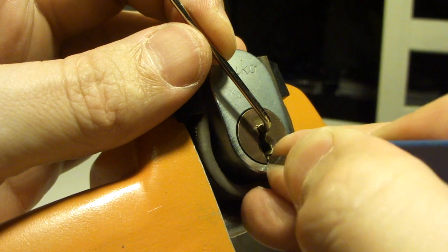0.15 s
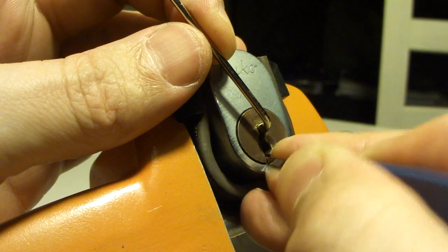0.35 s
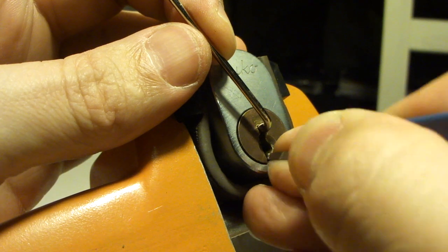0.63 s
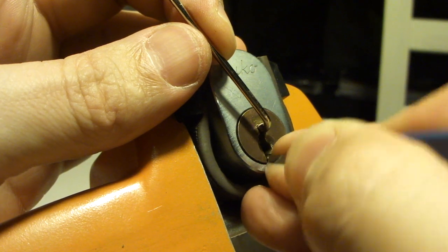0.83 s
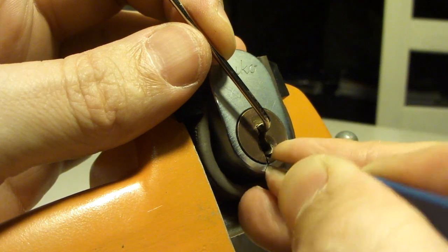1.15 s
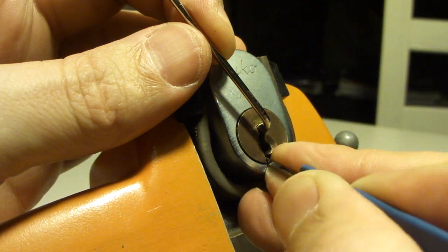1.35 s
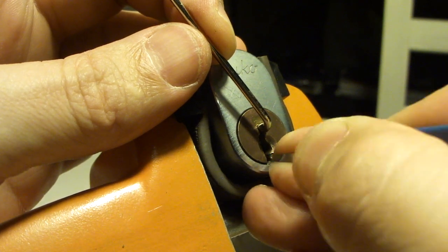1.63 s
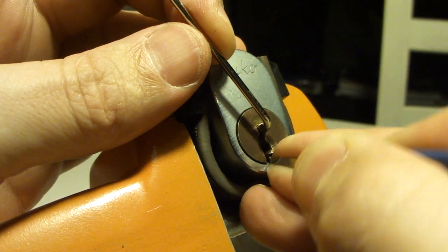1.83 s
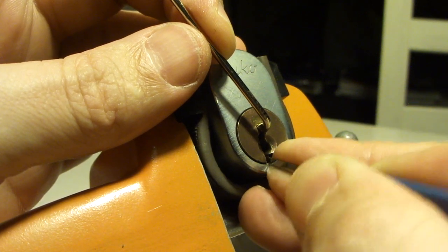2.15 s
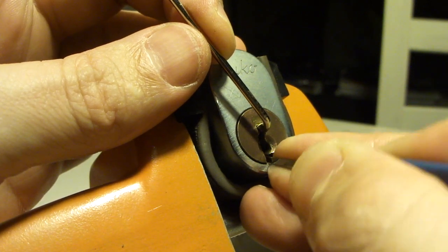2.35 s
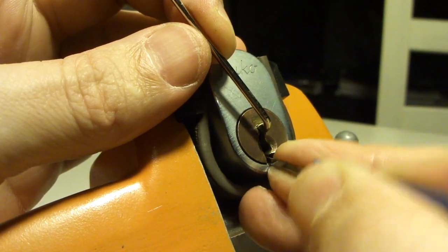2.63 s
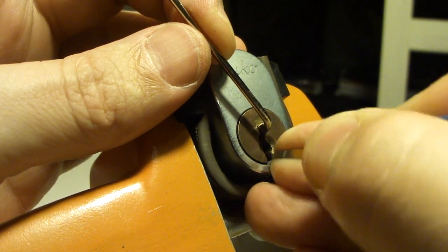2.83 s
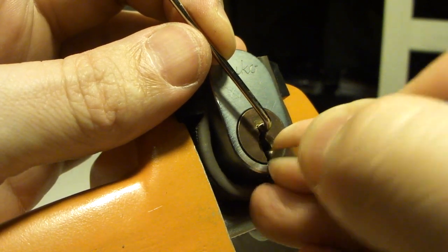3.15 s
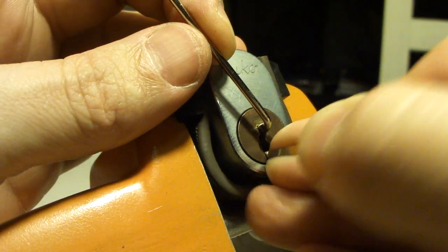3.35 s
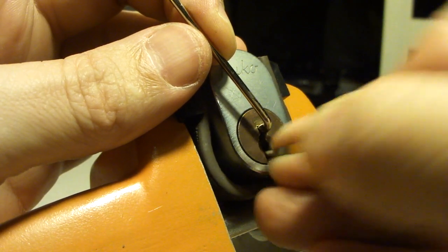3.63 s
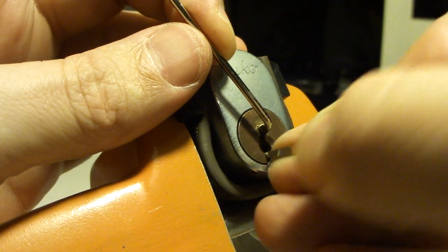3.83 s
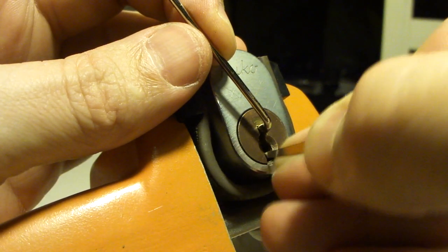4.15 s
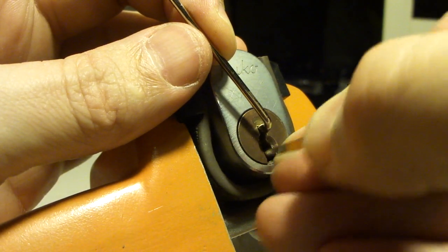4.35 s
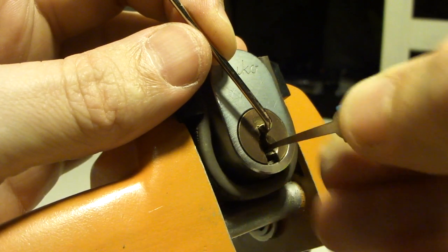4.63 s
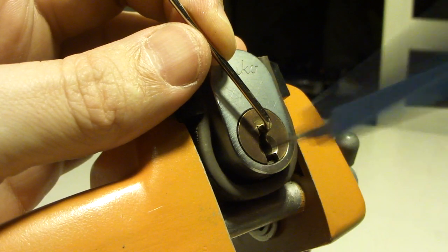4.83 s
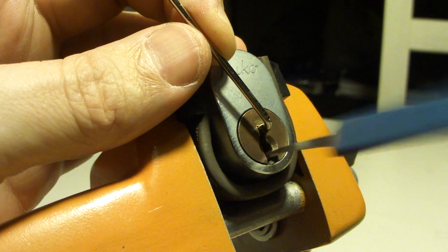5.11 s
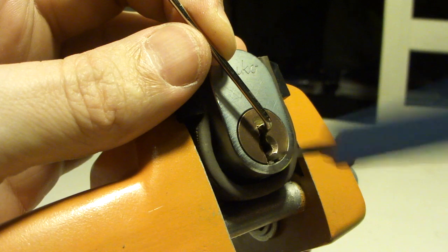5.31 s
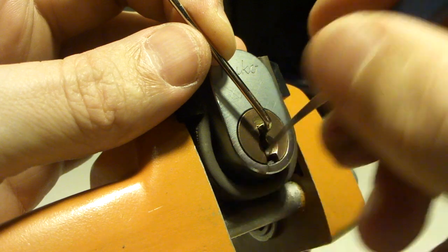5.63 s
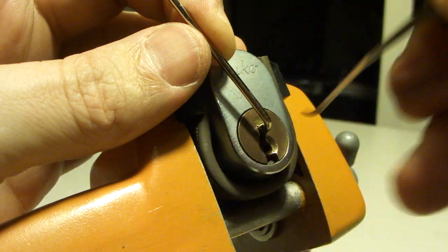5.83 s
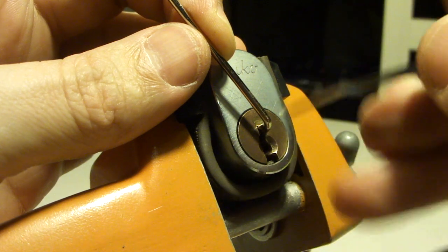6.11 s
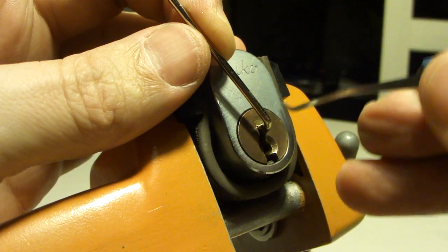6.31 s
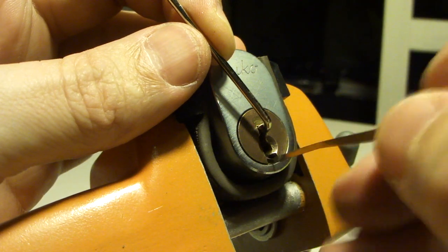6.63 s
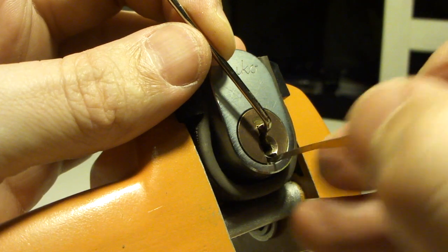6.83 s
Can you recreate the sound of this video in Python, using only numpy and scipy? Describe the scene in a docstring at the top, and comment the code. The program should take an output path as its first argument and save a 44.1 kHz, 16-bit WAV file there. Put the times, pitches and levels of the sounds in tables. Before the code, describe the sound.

Sharp, irregular metallic clicks from a pick snapping lock pins, then a quick scratchy scrape as the blade slides out, in a quiet room.

```python
"""Lock picking, close up

A thin steel pick works the pins of a hand-held lock in a small, quiet workshop, close to a camera.
Snaps, ticks and knocks are short forces that ring modes of mount, lock body, pick and pins; heavy pushes
sway the mount. Drawn out, the pick scrapes over pins by stick and slip; a free tip taps in high mode pairs.
Handling and sliding rub the same modes; reverberation, shaped room noise, hiss and a faint whine surround all.
"""
import sys
import numpy as np
from scipy import signal
from scipy.fft import rfft, irfft
from scipy.io import wavfile

SR = 44100
rng = np.random.default_rng(int(sys.argv[2]) if len(sys.argv) > 2 else 0)


def generate_wav(sig):
    """Save sig (samples, or channels by samples) to the path in sys.argv[1] as 16-bit PCM at SR."""
    pcm = np.round(np.clip(np.atleast_2d(sig).T, -1, 1) * 32767).astype(np.int16)
    wavfile.write(sys.argv[1], SR, pcm)


N = 307377
TIME = np.arange(N) / SR
RING_TIME = TIME[:SR // 3]

# modes of the mount: (frequency [Hz], relative level [dB], t60 [s])
MOUNT = [(292, -12, 0.16), (306, -16, 0.11), (367, 0, 0.061), (410, -3.5, 0.021), (479, -4.5, 0.04),
         (533.5, -1.5, 0.055), (621, -3, 0.075)]
# modes of the lock body: (frequency [Hz], relative level [dB], t60 [s])
BODY = [(737, -17, 0.12), (875, -10, 0.13), (939, -1.5, 0.048), (1035, 3.5, 0.027), (1200, -10, 0.022),
        (1318, 4.5, 0.042)]
# modes of the pick: (frequency [Hz], relative level [dB], t60 [s])
PICK = [(1563, -6.5, 0.14), (1656, -4.5, 0.14), (1811, 9.5, 0.032), (1817, -7.5, 0.036),
        (2013, -7.5, 0.066), (2050, -1.5, 0.045), (2420, -28, 0.033), (2538, -4.5, 0.03)]
# modes of the pins: (frequency [Hz], relative level [dB], t60 [s])
PINS = [(2835, -4, 0.046), (3320, 0.5, 0.012), (4520, -13.5, 0.045), (5590, 1, 0.022), (6010, -2, 0.036),
        (6540, 0, 0.025), (7090, 9, 0.018), (7520, 7.5, 0.0055), (7820, -2, 0.0064), (8070, -4, 0.0081),
        (8240, 2.5, 0.011), (8850, 2, 0.01), (9430, -11, 0.0088), (9900, 0, 0.02), (10100, -1, 0.022)]
# ringing parts: (modes, low edge [Hz], high edge [Hz], lag [ms], trim [dB], crack re modes [dB],
# crack decay [ms], difference between the ports [0-1])
PARTS = [(MOUNT, 204, 654, 0.58, 0, -6.5, 2.9, 0.067), (BODY, 715, 1620, 0.71, 0, -6, 2.3, 0.14),
         (PICK, 1480, 2472, 0.0, 0, -12, 8.6, 0.17), (PINS, 2760, 10330, 0.15, 0, 1, 1.9, 0.57)]

SWAY_HZ, SWAY_WIDTH_HZ = 122.7, 17
CREEP_LEAD_S = .006


def undb(db):
    """Decibels to gain."""
    return 10 ** (np.asarray(db) / 20)


def unit(x):
    """Scale to rms 1."""
    return x / np.sqrt(np.mean(x ** 2))


def band(x, lo_hz, hi_hz, order=3):
    """Causal band-pass, never narrower than 5 %."""
    edges_hz = [lo_hz, max(hi_hz, lo_hz * 1.05)]
    return signal.sosfilt(signal.butter(order, edges_hz, "band", fs=SR, output="sos"), x)


def add(out, s, sound):
    """Mix a stereo sound in at time s."""
    i = int(s * SR)
    out[:, i:i + sound.shape[1]] += sound[:, :N - i]


def hit_level(sound, db, length_s):
    """Give the first length_s of a sound the energy of 10 ms at level db."""
    energy = np.sum(sound[:, :int(length_s * SR)] ** 2) / 2
    return sound * undb(db) * np.sqrt(SR / 100 / energy)


def coloured(points):
    """Noise shaped in frequency by (Hz, dB) points, scaled to rms 1."""
    hz, db = np.transpose(points)
    bins_hz = np.maximum(np.fft.rfftfreq(N, 1 / SR), 1)
    shape_db = np.interp(np.log(bins_hz), np.log(hz), db)
    return unit(irfft(rfft(rng.standard_normal(N)) * undb(shape_db), N))


def air():
    """Steady room noise and hiss, common and opposed between the ports, with a faint electronic whine."""
    # noise common to both ports: (frequency [Hz], relative density [dB per Hz])
    mid_points = [(30, -23), (60, -29), (100, -20), (170, -9.5), (300, -3.5), (900, -6), (2100, -10.5),
                  (2700, -23), (3500, -29.5), (4600, -29.5), (6000, -20.5), (8000, -21), (10700, -24),
                  (12000, -51)]
    # noise opposed between the ports: (frequency [Hz], relative density [dB per Hz])
    side_points = [(30, -35), (60, -34), (100, -14.5), (170, -8), (300, -1), (900, -2.5), (2100, -9),
                   (2700, -22), (3500, -29), (4600, -28.5), (6000, -21.5), (8000, -22), (10700, -28),
                   (12000, -52)]
    mid_db, side_db = -58.5, -55
    whine_hz, whine_db = 7770, -83
    whine = unit(np.sin(2 * np.pi * whine_hz * TIME))
    mid = undb(mid_db) * coloured(mid_points) + undb(whine_db) * whine
    return mid + np.array([[1], [-1]]) * undb(side_db) * coloured(side_points)


def mode_bank(modes):
    """One fading oscillation per mode, starting at full speed."""
    hz, db, t60_s = np.transpose(modes)[:, :, None]
    fade = np.exp(-np.log(1000) * RING_TIME / t60_s)
    return undb(db) * fade * np.cos(2 * np.pi * hz * RING_TIME)


def response(part, bank, favour_db=0, scatter_db=5.0):
    """A part's answer to one contact: randomly weighted modes and a short crack of dense ones."""
    modes, lo_hz, hi_hz, _, _, crack_db, crack_ms, apart = part
    ports = np.array([[1], [-1]]) * apart
    weights = undb(favour_db + scatter_db * rng.standard_normal(len(bank)))
    weights = weights * (1 + ports * rng.standard_normal(len(bank)))
    common, opposed = rng.standard_normal((2, len(RING_TIME)))
    crack = (common + ports * opposed) * np.exp(-RING_TIME * 1e3 / crack_ms)
    # the crack gathers round the strong modes
    top_db = max(db for _, db, _ in modes)
    strong_hz = [hz for hz, db, _ in modes if db > top_db - 7.5]
    crack = band(crack + 1e-18, min(strong_hz), max(strong_hz), order=1)
    ring = unit(weights @ bank)
    return band(ring + undb(crack_db) * unit(crack), lo_hz, hi_hz, order=6)


def grit(size, spread_db=3.0):
    """Tiny slips of very unequal strength."""
    strength_db = spread_db * rng.exponential(size=size).clip(0, 4)
    return unit(rng.standard_normal(size) * undb(strength_db))


def effort():
    """Levels (dB) of handling and sliding: moves swell, hold and die back to the resting hand."""
    # grip shifts and draws of the pick: (start [s], end [s], handling level [dB], sliding level [dB])
    moves = [(4.364, 4.63, -56.5, -67), (4.854, 4.926, -62, -50.5), (4.974, 5.054, -56, -61),
             (5.17, 5.65, -65.5, -61.5), (6.598, 6.847, -65, -67)]
    attack_s, release_s, resting_db = 0.03, 0.11, -81
    power = undb(resting_db) ** 2
    for start_s, end_s, *levels_db in moves:
        before_s = np.maximum(start_s - TIME, 0)
        after_s = np.maximum(TIME - end_s, 0)
        swell = np.exp(-before_s / attack_s - after_s / release_s)
        power = power + (undb(levels_db)[:, None] * swell) ** 2
    return 10 * np.log10(power)


def rubbing(banks, body_db=-3, pins_db=-9, soft_hz=320, soft_db=5):
    """Fingers shift on the mount and the blade slides in the keyway: fine friction; sliding sways the mount."""
    hand_db, slide_db = effort()
    out = 0
    for part, bank, db in zip(PARTS, banks, [hand_db, slide_db + body_db, slide_db, slide_db + pins_db]):
        slips = grit(N) * (rng.random(N) < 280 / SR)  # 280 slips per second on average
        # soft skin favours the low modes
        mode_hz = np.array(part[0])[:, 0]
        favour_db = soft_db * np.exp(-(3 * np.log(mode_hz / soft_hz)) ** 2)
        sound = signal.fftconvolve(response(part, bank, favour_db), slips[None])[:, :N]
        out = out + unit(sound) * undb(db)
    sway = band(rng.standard_normal(N), SWAY_HZ - SWAY_WIDTH_HZ / 2, SWAY_HZ + SWAY_WIDTH_HZ / 2, order=2)
    # sway grows steeply with sliding: 1.73 dB per dB from -66.5 dB at a -60 dB slide, floor -80.5 dB
    sway_db = np.maximum(-66.5 + 1.73 * (slide_db + 60), -80.5)
    return out + unit(sway) * undb(sway_db)


def depth(s):
    """How deep the blade bears at time s: 0 at the mouth of the keyway, 1 at the back."""
    # blade position: (time [s], depth [0-1])
    depth_points = [(0, 0.96), (3.55, 0.88), (4.3, 0), (5.0, 0.57), (5.6, .05)]
    return np.interp(s, *np.transpose(depth_points))


def part_levels(s, db, weight_db, edge_db):
    """Share a contact among mount, body, pick and pins (dB); the body rings more near the keyway mouth."""
    base_db, weight_share, mouth_db = -10, 0.37, 7.5
    body_db = base_db + weight_share * weight_db + mouth_db * (1 - depth(s))
    return db + np.array([weight_db, body_db, 0, edge_db])


def even(force):
    """Hard contacts push all modes about equally: keep a force's timing, level its spectrum."""
    spectrum = rfft(force, 4096)
    power = np.abs(spectrum) ** 2
    return irfft(spectrum / np.sqrt(power + power.mean() / 10))[:len(force)]


def snap(chatter_ms, db, chatter=0.93, creep_db=-50, creep_s=0.0021):
    """Force of one snap: the pin creeps for a moment, lets go, and chatters against its seat."""
    t = TIME[:SR // 50]
    age = t * 1e3 / chatter_ms
    bounces = grit(len(t)) * age * np.exp(-age)
    bounces *= chatter / np.linalg.norm(bounces)
    bounces[0] += 1
    release = even(bounces)
    # relative to db, so creep is equally faint before soft and hard snaps (capped at half the release)
    before_s = TIME[:int(CREEP_LEAD_S * SR)][::-1]
    slips = grit(len(before_s)) * np.exp(-before_s / creep_s)
    creep = min(undb(creep_db - db), .5) * slips / np.linalg.norm(slips)
    return np.concatenate([creep, release / np.linalg.norm(release)])


def blow(banks, s, levels, focus_width=0.15, focus_db=7):
    """One contact rings every part at its level (dB); returns (start s, sound) for each part."""
    mount_db, _, pick_db, _ = levels
    # harder snaps chatter longer: 0.38 ms for the faintest, 8.6 ms more at full scale
    force = snap(0.38 + 8.6 * undb(pick_db), max(levels))
    # favoured mount pitch: higher under a deep pick, lower under a heavy push
    mouth_hz, deep_hz, pick_hz, weight_db_per_octave = 385, 482, 1810, 55
    mount_hz = np.interp(depth(s), [0, 1], [mouth_hz, deep_hz])
    mount_hz = mount_hz * 2 ** ((pick_db - mount_db) / weight_db_per_octave)
    rings = []
    for part, bank, db in zip(PARTS, banks, levels):
        modes, _, _, lag_ms, trim_db = part[:5]
        distance = np.log(np.array(modes)[:, :1] / [mount_hz, pick_hz]) / focus_width
        favour_db = focus_db * np.exp(-distance ** 2).sum(1)
        sound = signal.fftconvolve(response(part, bank, favour_db), force[None])
        sound = hit_level(sound, db + trim_db, CREEP_LEAD_S + .02)
        rings.append((s - CREEP_LEAD_S + lag_ms / 1e3, sound))
    return rings


def faint_ticks(count=5):
    """Light touches at loosely spread moments as the pick feels along the pins; rows as for snaps."""
    start_s, end_s = 3.9, 4.8
    mean_db, spread_db, weight_db, edge_db = -60, 2, -4, -6
    place, strength = rng.random((count, 2)).T
    times_s = start_s + (end_s - start_s) * (np.arange(count) + place) / count
    levels_db = mean_db + spread_db * (2 * strength - 1)
    return [(s, db, weight_db, edge_db) for s, db in zip(times_s, levels_db)]


def clicks(banks):
    """Snapping pins, faint touches and knocks of the shank on the keyway wall, all ringing every part."""
    # pins snapping: (time [s], pick level [dB], push on the mount re pick [dB], pin tick re pick [dB])
    snaps = [(.152, -29, -13, -17), (0.3841, -18, -2, -16), (0.496, -47, -3, -22), (.5905, -45, 7, -13),
             (.625, -42, 3, -8), (.64, -46, -2, -9), (.917, -47, -5, -20), (.961, -49, -2.5, -25),
             (1.0651, -29, -13.5, -23.5), (1.115, -28.5, -8, -7.5), (1.306, -50, -20, -20),
             (1.603, -42.5, -2.5, -8), (1.863, -41, -7, -20.5), (1.926, -34.5, 8, -5.5),
             (2.8116, -30, -16, -3), (3.212, -35, -5, -11), (3.557, -40.5, -11, -17.5),
             (3.575, -51.5, 4, -10), (3.65, -46.5, -7.5, -23), (3.822, -53, -6, -16),
             (3.976, -52.5, -0.5, -11), (4.299, -54, -5, -7), (4.365, -56.5, 10, -8),
             (4.4025, -40.5, -7, -18.5), (4.469, -38, -15, -6), (4.617, -44, -9, -22),
             (4.691, -49, -9, -10.5), (4.841, -36.5, -8.5, -6), (4.8955, -39, -1, -3.5),
             (5.006, -32.5, -8, -9), (5.232, -48.5, 3.5, 0.5), (5.555, -53.5, -9, -1),
             (5.59, -52.5, 3, 7.5), (6.59, -52, 1.5, -7), (6.616, -58.5, -1, 4.5), (6.637, -57.5, -3, 3),
             (6.832, -46, -6.5, -16.5)]
    # shank knocks, mostly ringing the lock body: (time [s], body level [dB])
    knocks = [(.725, -44.5), (4.617, -45), (4.8954, -36.5), (4.95, -43), (5.008, -37.5), (5.361, -52),
              (5.554, -44), (6.637, -49.5)]
    knock_parts_db = np.array([-13.5, 0, -5.5, -18])  # mount, body, pick, pins re body
    contacts = [(row[0], part_levels(*row)) for row in list(snaps) + faint_ticks()]
    contacts += [(s, db + knock_parts_db) for s, db in knocks]
    out = np.zeros((2, N))
    for s, levels in contacts:
        for start_s, sound in blow(banks, s, levels):
            add(out, start_s, sound)
    return out


def room(x, first_s=0.0016, apart=0.21):
    """Diffuse reflections from bench and walls: fading noise per band; the lows stay longest."""
    # reverberation: (low edge [Hz], high edge [Hz], level before band-pass [dB], t60 [s])
    reverb_bands = [(89.5, 336, -11.5, 0.45), (232, 1100, -11, 0.31), (650, 1290, -11, 0.37),
                    (1450, 3500, -15.5, 0.38), (2650, 10600, -13.5, 0.21)]
    t, tail = TIME[:SR * 3 // 4], 0
    for lo_hz, hi_hz, db, t60_s in reverb_bands:
        common, opposed = rng.standard_normal((2, len(t)))
        onset = np.clip(t / first_s - 1, 0, 1)
        fade = np.exp(-np.log(1000) * t / t60_s) * onset
        echoes = (common + np.array([[apart], [-apart]]) * opposed) * fade
        tail = tail + undb(db) * band(echoes / np.linalg.norm(echoes[0]), lo_hz, hi_hz)
    return signal.fftconvolve(x, tail, axes=1)[:, :N]


def thumps(t60_s=0.41, dull_hz=95, dull_t60_s=0.057, dull_db=2):
    """Heavy pushes rock the mount: a short dull lurch, then a longer sway at the sway mode."""
    # pushes: (time [s], level [dB])
    pushes = [(.385, -44), (.591, -52.5), (.626, -51), (1.118, -58), (1.93, -57.5), (4.368, -64),
              (4.618, -62)]
    out = np.zeros((2, N))
    sway = band(mode_bank([(SWAY_HZ, 0, t60_s), (dull_hz, dull_db, dull_t60_s)]).sum(0), 76, 167)
    for s, db in pushes:
        add(out, s, hit_level(np.array([sway, sway]), db, .02))
    return out


def scrapes(banks, weight_db=-2.5, slip_rate_hz=650, fine=0.1, sizzle_db=-10):
    """A short run of stick and slip as the blade rides over a pin; its rough edge sizzles on top."""
    # drags over a pin: (time [s], length [s], pick level [dB], pin level re pick [dB])
    drags = [(0.792, .024, -65.5, 3.5), (3.865, 0.02, -57.5, 3), (4.834, 0.012, -42.5, -15),
             (4.86, 0.015, -44.5, -14), (4.875, 0.0168, -38.5, -4), (4.935, 0.022, -40, -6),
             (4.991, .013, -38.5, -8), (5.046, 0.023, -46, -1.5), (5.105, 0.012, -56.5, 0),
             (5.166, 0.021, -49, -5), (5.229, 0.025, -44, -11.5), (5.304, .021, -53.5, -0.5),
             (5.356, 0.016, -46, -4), (5.43, .024, -52, 0), (5.483, 0.024, -52, -5),
             (5.564, 0.015, -45.5, -9), (5.604, 0.013, -51, -13), (5.711, 0.022, -59, 4),
             (6.822, .008, -54.5, -2)]
    out = np.zeros((2, N))
    for s, length_s, level_db, edge_db in drags:
        levels = part_levels(s, level_db, weight_db, edge_db)
        size = int(length_s * SR)
        contact = signal.windows.tukey(size, .6)
        slips = (rng.random(size) < slip_rate_hz / SR) * rng.standard_normal(size)
        force = even((slips + fine * grit(size) / 2) * contact)
        for part, bank, db in zip(PARTS, banks, levels):
            sound = signal.fftconvolve(response(part, bank), force[None])
            add(out, s, hit_level(sound, db, length_s + .012))
        sizzle = unit(force) + .5 * grit((2, size)) * contact
        sizzle = band(sizzle, 8700, 11300, order=2)
        add(out, s, hit_level(sizzle, levels[-1] + sizzle_db, length_s))
    return out


def tinks(t60_s=0.02, pair=0.936, crack_db=-5, crack_s=.002):
    """A free blade tip touches the lock face and rings briefly in a close pair of high modes."""
    # touches: (time [s], level [dB], upper ring frequency [Hz])
    touches = [(.804, -58.5, 6630), (5.732, -47, 6820), (6.6584, -48.5, 6950), (6.671, -48, 6660)]
    out = np.zeros((2, N))
    for s, db, hz in touches:
        ring = mode_bank([(hz, 0, t60_s), (hz * pair, -3, t60_s)]).sum(0)
        crack = rng.standard_normal((2, len(RING_TIME))) * np.exp(-RING_TIME / crack_s)
        crack = band(crack + 1e-18, 5300, 9400)
        add(out, s, hit_level(unit(ring) + undb(crack_db) * unit(crack), db, .02))
    return out


def scene():
    """The lock close up, its reverberation and the quiet room."""
    banks = [mode_bank(part[0]) for part in PARTS]
    lock = clicks(banks) + scrapes(banks) + thumps() + tinks() + rubbing(banks)
    return lock + room(lock) + air()


def record(dry):
    """The camera rounds loud peaks, sheds the deep bass, notches narrow bands and cuts the top."""
    # dips in the camera's response: (centre [Hz], width [Hz])
    notches = [(3020, 410), (4020, 550), (5020, 590)]
    round_peak, low_cut_hz, top_hz = .7, 36, 14600
    sound = round_peak * np.tanh(dry / round_peak)
    sound = signal.sosfilt(signal.butter(2, low_cut_hz, "high", fs=SR, output="sos"), sound)
    for hz, width_hz in notches:
        sound = signal.lfilter(*signal.iirnotch(hz, hz / width_hz, fs=SR), sound)
    return signal.sosfilt(signal.ellip(8, .2, 70, top_hz, fs=SR, output="sos"), sound)


dry = scene()
out = record(dry)
generate_wav(out)
```